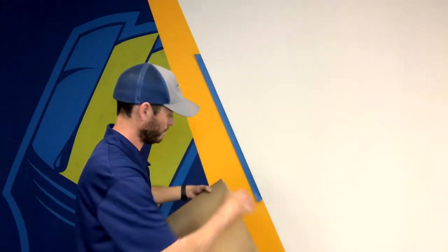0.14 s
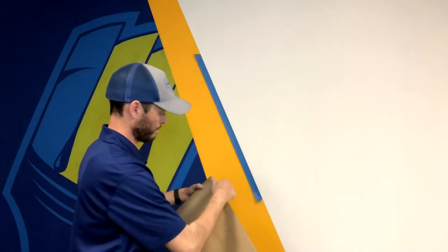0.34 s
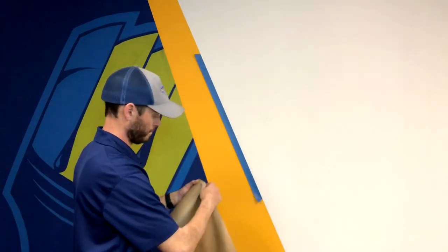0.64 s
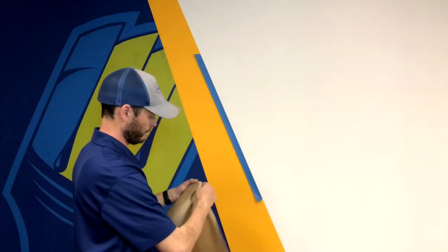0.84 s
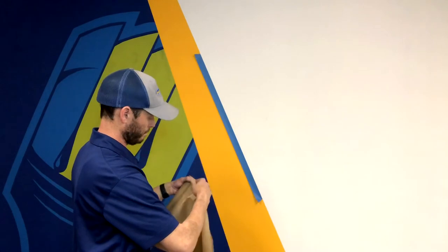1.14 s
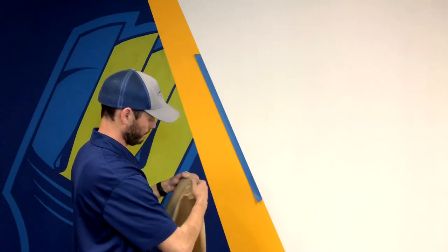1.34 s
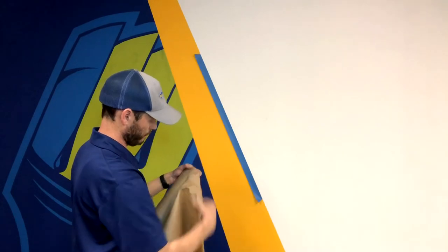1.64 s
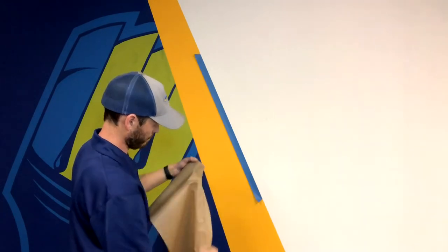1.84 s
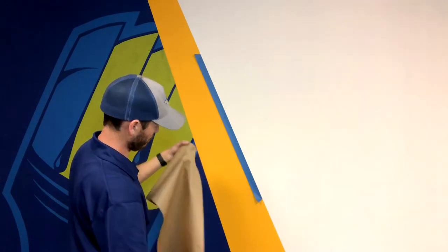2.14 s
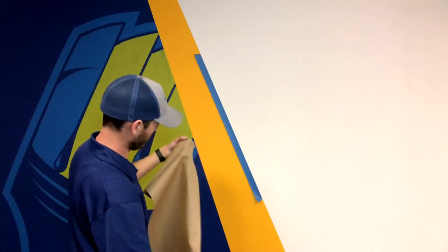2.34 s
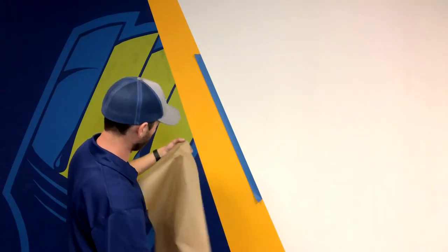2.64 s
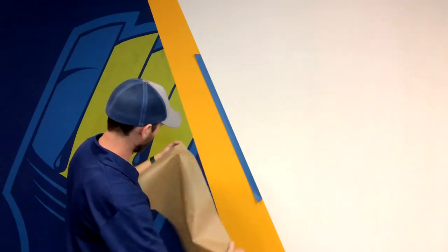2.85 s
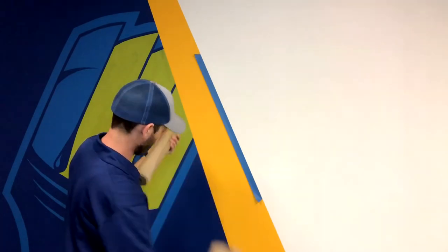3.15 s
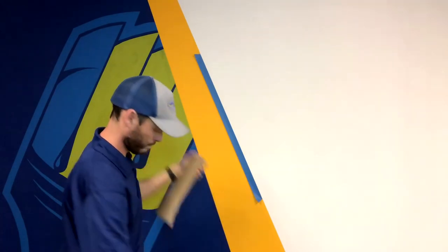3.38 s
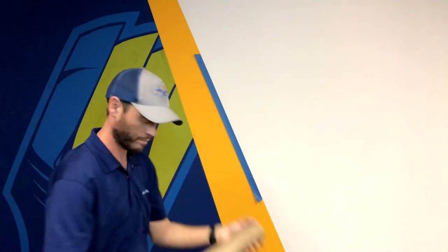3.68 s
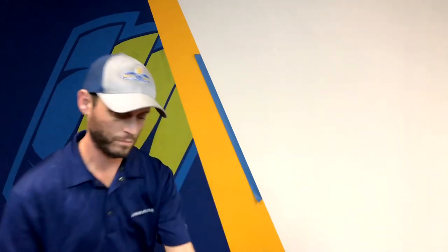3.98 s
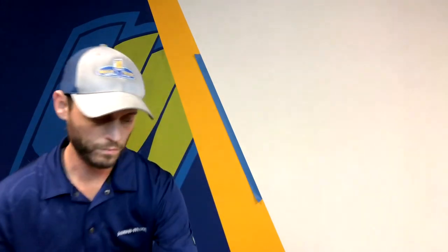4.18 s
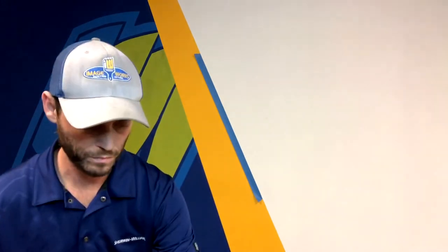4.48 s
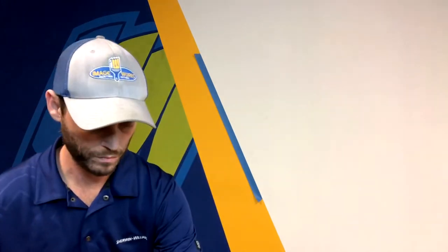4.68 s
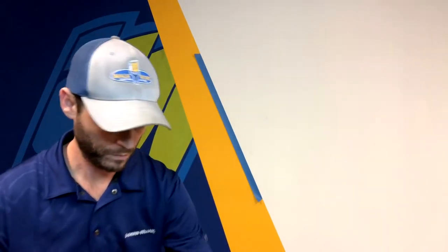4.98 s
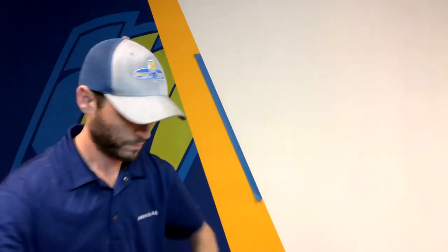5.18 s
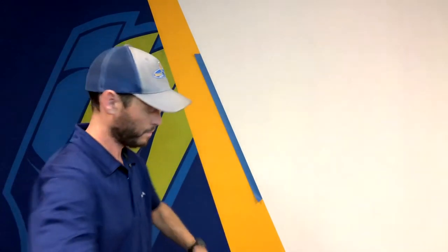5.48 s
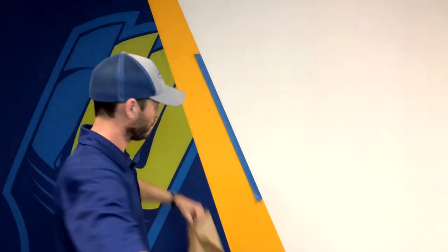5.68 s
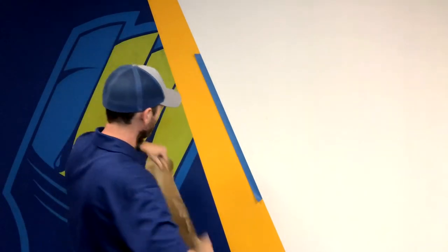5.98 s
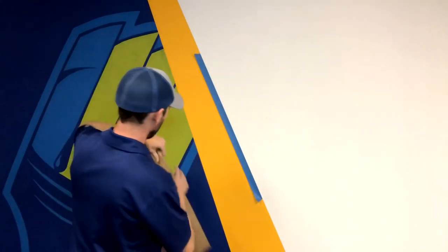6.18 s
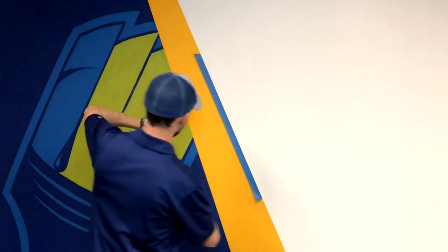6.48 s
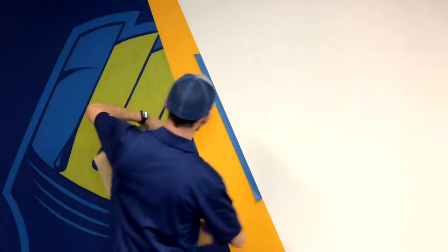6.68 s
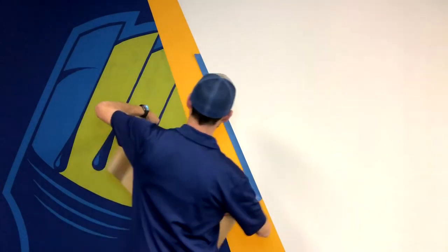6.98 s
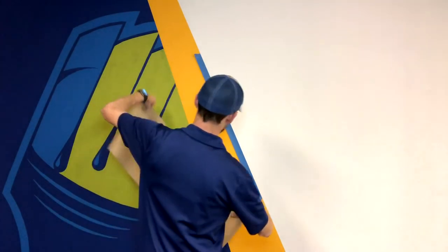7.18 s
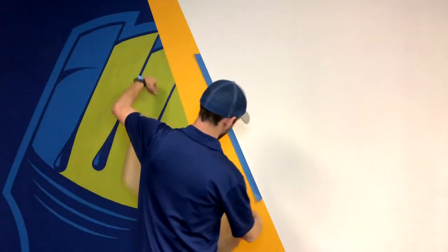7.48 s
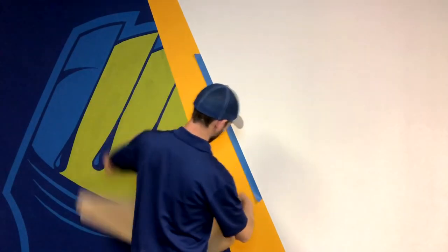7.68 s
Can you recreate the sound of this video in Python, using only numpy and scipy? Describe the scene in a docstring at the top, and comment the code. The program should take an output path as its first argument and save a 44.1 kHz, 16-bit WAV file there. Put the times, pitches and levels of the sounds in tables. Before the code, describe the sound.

In a bare, reverberant room, hands work a stiff sheet of brown paper. Soft sliding grows into sharp crackles and pops, then a short bright rip. After faint rustling, something is put down with a hollow double knock that booms briefly. The paper is gathered in a loud rustle and smoothed with crisp crinkles and a tiny faint squeak. Low ventilation rumble and light hiss continue under one fairly close microphone.

```python
"""In a bare, echoing room a man handles a sheet of brown masking paper: it slides, buckles and crackles.
He rips a piece off, sets something down with a hollow double knock, then gathers the sheet and smooths
it on the wall with a brief squeak. Paper is random clicks and hiss, filtered and dispersed as bending waves;
the tear is a dense stream of fibre breaks; the knock is contact pulses ringing damped modes.
Walls answer with decaying reflections, over ventilation rumble and faint hiss at one microphone."""
import sys
import numpy as np
from scipy import signal
from scipy.fft import rfft, irfft, next_fast_len
from scipy.io import wavfile
from scipy.ndimage import uniform_filter1d

SR = 44100
rng = np.random.default_rng(int(sys.argv[2]) if len(sys.argv) > 2 else 0)


def store_wav(level_fs):
    """Save 16-bit WAV to argv[1]."""
    pcm = np.round(np.clip(np.atleast_2d(level_fs), -1, 1) * 32767)
    wavfile.write(sys.argv[1], SR, pcm.T.astype(np.int16))


N = 345303
TIME = np.arange(N) / SR

# Steady background spectrum: [f/Hz, relative level/dB]
BACKGROUND_SPECTRUM = [(20, -9), (40, 1.5), (62, 1.5), (95, 0.5), (130, -2.5), (230, -5), (500, -7),
                       (1200, -22), (3000, -12), (7000, -18.5), (9000, -22), (16000, -30.5)]
# Reverberation of the room: [f/Hz, time to decay by 60 dB/s]
ROOM_DECAY = [(100, 0.5584), (200, 0.7809), (330, 0.3488), (1000, 0.5991), (3000, 0.8092), (7000, 0.564),
              (10000, 0.4678), (15000, 0.4123)]
# Spectrum of the room's boom after the knock: [f/Hz, relative level/dB]
BOOM_SPECTRUM = [(50, -16.5), (110, -11), (170, -2), (240, 0), (340, 5), (420, -10.5), (600, -7),
                 (780, -9.5), (980, -7.5), (1250, -16.5), (1700, -17.5), (3000, -46), (16000, -58.5)]
# Contacts of the knock: [t/s, relative level/dB, strongest frequency of the contact f/Hz]
KNOCK_CONTACTS = [(4.386, -5.5, 228.5), (4.3907, -12, 558.4), (4.405, -14.5, 130), (4.4106, -3, 853.3),
                  (4.418, -9.5, 452.6), (4.442, -23.5, 80), (4.465, -24.5, 500.4), (4.496, -24.5, 287)]
# Damped modes rung by the knock: [f/Hz, relative level/dB, time to decay by 60 dB/s]
HOLLOW_MODES = [(65.54, -15.5, 0.35), (93.754, -13, 0.25), (119.24, -11, 0.2553), (167.75, -13.5, 0.1537),
                (221.63, -13.5, .25), (258.04, -17.5, 0.239), (325.67, -20, 0.6656), (350.08, -18, 0.536),
                (464.89, -5.5, 0.07237), (526.31, -4.5, 0.0576), (631.34, -5.5, 0.0467),
                (915.7, -4.5, 0.05504), (1021.2, -0.5, 0.02555), (1332.7, -9, 0.027)]
# A hand squeaks on the paper against the wall: [t/s, length/s, mean f/Hz, relative level/dB]
HAND_SQUEAK = (7.47, .12, 1060.5, -48)
# Spectrum of tearing fibres: [f/Hz, relative level/dB]
FIBRE_SPECTRUM = [(50, -29.5), (150, -19.5), (225, -7.5), (400, -18), (520, -9), (720, -11), (950, -6),
                  (2200, -5.5), (3900, 2.5), (5600, 0), (7200, 2.5), (8500, -2.5), (12000, -5.5),
                  (16000, -11)]
# Spectrum of the crackling sheet: [f/Hz, relative level/dB]
PAPER_SPECTRUM = [(50, -31), (150, -16), (220, -5), (400, -5.5), (720, -4.5), (950, 0), (1550, 2),
                  (2400, -2), (4000, 0.5), (5600, -4), (7600, -4.5), (8500, -11), (12000, -16),
                  (16000, -23.5)]
# Strokes of the hands over the sheet: [t/s, length/s, relative starting level/dB,
# swell (+) or sag (-) over the stroke/dB, crispness/dB, low flapping/dB]
HAND_STROKES = [(-0.046, 0.14114, -40.5, -9.0, -15.5, -0.5), (0.114, 0.14492, -46.0, -3.0, -21, -1.5),
                (0.302, 0.24954, -55.0, 13.5, -3, -3.0), (0.549, 0.45, -43.5, 6, 1.5, 1),
                (0.996, 0.23296, -31.0, -10.0, -3, 2.5), (1.228, 0.1069, -30.0, -5.0, 1, -3.5),
                (1.342, 0.0937, -34.0, 6.5, 6, -3.5), (1.45, 0.11147, -36.5, -5.5, 1.0, 4),
                (1.582, 0.198, -37.5, 1.0, 0.5, 1.0), (1.768, 0.2464, -34.5, -2.0, 2.5, -1.5),
                (2.021, 0.06284, -28.5, -3.5, 3, -2.5), (2.131, 0.1543, -44.0, 0.5, -13.5, -2.5),
                (2.303, 0.19336, -35.5, -7.5, -12.5, -6.5), (2.503, 0.1593, -42.0, 6.5, -2, -4),
                (2.649, 0.3546, -31.0, -9.0, 3, 0.5), (3.243, 0.40624, -39, -17.5, -9.5, 4),
                (3.686, 0.1976, -48.0, 4.5, -6, 1.5), (3.891, 0.16035, -48.5, -6, -5, 2.5),
                (4.048, 0.3357, -46.0, -9, -7, -3.5), (4.691, 0.05901, -48.5, -2, -9.5, -5.5),
                (4.905, 0.2865, -60, -5, 4.0, -3.5), (5.197, 0.27274, -32.5, -5.5, 3.5, -4),
                (5.471, 0.126, -38.0, 4, 4, -1.5), (5.601, 0.54922, -25.5, -22.5, -1, -3),
                (6.158, 0.2266, -45.0, -0.5, 0, -0.5), (6.366, 0.1731, -34.0, -1.5, 4.5, 1.5),
                (6.513, 0.24785, -28.0, -5.5, 2, -0.5), (6.769, 0.1627, -38.0, -5.5, -0.5, 2),
                (6.917, 0.3896, -40.5, 5.0, 6.5, -0.0), (7.325, 0.1187, -45.0, -8, 3.5, -6.5),
                (7.451, 0.0992, -44, 1, 0, -1.5), (7.613, 0.2057, -45.0, 6, -1.5, -2.5)]
# Big creases that give way: [t/s, relative level/dB, decay constant/s, brightness/(dB per octave)]
BUCKLING_CREASES = [(0.424, -49.5, 0.012, 0.0), (0.5443, -34.5, 0.015, 2.5), (0.5717, -36.5, 0.026, 3.5),
                    (0.7212, -34, 0.022, 3), (0.778, -34, 0.021, 6), (1.002, -28.0, 0.005, 3),
                    (1.022, -32.5, 0.03, 1), (1.17, -38, 0.016, 12.0), (1.2376, -33.5, 0.012, 8.5),
                    (1.273, -30.5, 0.012, 1.0), (1.375, -32.0, 0.04, 7.5), (1.6432, -33.5, 0.014, 2.0),
                    (1.7978, -27, 0.012, 2.5), (1.873, -29.5, 0.0075, 1.5), (1.9425, -23.0, 0.004, 5.5),
                    (2.042, -26.5, 0.015, 2.5), (2.316, -38, 0.015, 0), (2.4952, -30.0, 0.0075, 0.5),
                    (2.593, -32.5, 0.008, 2.0), (2.6615, -32.5, 0.014, 4.5), (2.714, -31.5, 0.03, 3.5),
                    (2.851, -26, 0.0064, 4.0), (3.51, -40, 0.019, 0.5), (4.209, -47.5, 0.009, 4),
                    (4.323, -47.0, 0.0015, 0), (4.3887, -35, 0.036, -0.5), (4.609, -40, 0.011, -4.5),
                    (4.9925, -36.5, 0.0016, -1.5), (5.135, -37.5, 0.004, 0), (5.2008, -29, 0.0076, 2.5),
                    (5.2146, -22.0, 0.01, 2.5), (5.4992, -34.0, 0.016, 4.5), (6.175, -40.0, 0.018, 1.5),
                    (6.3077, -39.0, 0.014, 0), (6.423, -33, 0.012, 6.5), (7.585, -32, 0.009, 2.0)]

# Stroke onset at the usual level, and release constant; gentler strokes take hold more slowly
ATTACK_S, RELEASE_S = 0.017447, 0.03233
SLOWER_PER_DB = 0.0131
# A gentle, limp stroke mostly flexes the sheet: its middle band falls with level and crispness (dB per dB)
USUAL_DB, FLEX_PER_LEVEL, FLEX_PER_CRISP = -37, 0.2204, .2
# The rip bites quickly, weakens as the tear runs, and dies away once the piece is free
RIP_AT_S, RIP_BITE_S, RIP_RUN_S = 3.009, 0.032537, 0.1282
RIP_SAG_DB_PER_S, RIP_END_DB_PER_S = 67, 250  # the end rate adds to the sag
EDGE_HZ = 15900  # upper band limit


def amp(db):
    """Logarithmic level: decibels to amplitude gain."""
    return 10 ** (np.asarray(db) / 20)


def read(points, hz):
    """Interpolation: a table of (f/Hz, value) is read on a logarithmic frequency axis."""
    f, value = np.transpose(points)
    return np.interp(np.log(hz + 1), np.log(f + 1), value)


def add(mix, s, sound):
    """Superposition: mixes a sound in at time s."""
    part = mix[round(s * SR):][:len(sound)]
    part += sound[:len(part)]


def colour(x, spectrum, tilt=0, size=4096):
    """Minimum-phase filtering: a causal response of unit energy, tilted in dB per octave above the bass."""
    hz = abs(np.fft.fftfreq(size, 1 / SR))
    level_db = read(spectrum, hz) + tilt * np.log2(1 + hz / 1000)
    log_gain = np.log(amp(level_db))
    # the Hilbert transform of the log gain gives the minimum phase
    response = np.exp(signal.hilbert(log_gain).conj())
    taps = np.fft.ifft(response).real[:size // 2]
    return signal.oaconvolve(x, taps / np.linalg.norm(taps))[:len(x)]


def crackle(per_s, spread_db, size):
    """Random impulse process: clicks of unit mean power, many small and a few large."""
    clicks = (rng.random(size) < per_s / SR) * rng.choice([-1., 1.], size)
    clicks *= amp(spread_db * np.minimum(rng.exponential(1, size), 4.5))
    return clicks / (clicks.std() + 1e-9)


def spectra(x, size=256):
    """Short-time Fourier analysis, with frequencies as a column."""
    hz, t, z = signal.stft(x, SR, nperseg=size, noverlap=size - size // 4)
    return hz[:, None], t, z


def waveform(z, size=256):
    """Overlap-add synthesis: short-time spectra back to sound."""
    return signal.istft(z, SR, nperseg=size, noverlap=size - size // 4)[1][:N]


def background(level_db=-59):
    """Stationary filtered noise: steady ventilation rumble and faint hiss."""
    return amp(level_db) * colour(rng.standard_normal(N), BACKGROUND_SPECTRUM)


def room(x, build_s=0.0017):
    """Reverberation: dense reflections from hard walls build up quickly and decay at rates set by frequency."""
    t = np.arange(SR) / SR
    reflections = rng.choice([-1., 1.], SR) * (rng.random(SR) < 5000 / SR)
    reflections *= 1 - np.exp(-t / build_s)
    hz, age, z = spectra(reflections)
    decay = np.exp(-np.log(1000) * age / read(ROOM_DECAY, hz))
    tail = waveform(z * decay)
    return signal.oaconvolve(x, tail / np.linalg.norm(tail))[:N]


def wandering_room(x, turns_per_s=16, count=6):
    """Source-dependent reflection: the crackle cycles among spots, each with its own room response."""
    place = TIME * turns_per_s * count
    nearness = (np.maximum(1 - abs((place - k) % count - 1), 0) for k in range(count))
    return sum(room(x * np.sqrt(share)) for share in nearness)


def blows():
    """Contact force: a blunt thing lands on one edge, then flat, and settles in soft pushes and rebounds."""
    force, t = np.zeros(N), np.arange(-SR // 20, SR // 20) / SR
    for s, db, contact_hz in KNOCK_CONTACTS:
        # derivative of a Gaussian, strongest at contact_hz
        u = 2 * np.pi * contact_hz * t
        pulse = -u * np.exp(-u ** 2 / 2)
        add(force, s + t[0], amp(db) * pulse * 2 * np.pi * contact_hz / SR)
    return force


def knock(level_db=-3, boom_db=9.5, muffle_hz=1450):
    """Modal excitation: the blows ring a few hollow damped modes and set the room booming."""
    force, t = blows(), np.arange(SR) / SR
    ring = np.zeros(SR)
    for k, (hz, db, t60) in enumerate(HOLLOW_MODES):
        decay = np.exp(-np.log(1000) * t / t60)
        ring += (-1) ** k * amp(db) * decay * np.sin(2 * np.pi * hz * t)
    muffled = signal.sosfilt(signal.butter(4, muffle_hz, fs=SR, output="sos"), ring)
    hollow = signal.oaconvolve(force, muffled)[:N]
    boom = room(colour(force, BOOM_SPECTRUM))
    return amp(level_db) * hollow + amp(boom_db) * boom


def squeak(waver=.01):
    """Stick-slip friction: skin sticks and slips at a nearly steady rate for a moment."""
    s, length_s, hz, db = HAND_SQUEAK
    size, out = int(length_s * SR), np.zeros(N)
    drift = uniform_filter1d(rng.standard_normal(size), size // 20)
    turns = np.cumsum(hz * (1 + waver * drift / drift.std())) / SR
    add(out, s, amp(db) * np.hanning(size) * np.sin(2 * np.pi * turns))
    return out


def rip(level_db=-10.5, tilt=-1.1, surge_db=1.3436, surge_tilt=1.0, surge_s=0.011):
    """Fracture: fibres break in a dense stream as the tear runs, in surges that are louder and brighter."""
    age = np.maximum(TIME - RIP_AT_S, 0)
    surge = uniform_filter1d(rng.standard_normal(N), max(int(surge_s * SR), 1))
    surge = np.tanh(surge / surge.std())
    breaks = crackle(16000, 1.6, size=N)
    hz, t, z = spectra(colour(breaks, FIBRE_SPECTRUM))
    slope = tilt + surge_tilt * np.interp(t, TIME, surge)
    torn = waveform(z * amp(slope * np.log2((hz + 1000) / 6000)))
    fall_db = RIP_SAG_DB_PER_S * age + RIP_END_DB_PER_S * np.maximum(age - RIP_RUN_S, 0)
    bite = np.minimum(age / RIP_BITE_S, 1)
    return torn * bite * amp(level_db - fall_db + surge_db * surge)


def bending(x, lag_s=0.0013813):
    """Dispersion: in bending waves the treble outruns the bass, so each click is smeared."""
    size = next_fast_len(len(x) + 4096)
    hz = np.fft.rfftfreq(size, 1 / SR)
    # group delay is lag_s * sqrt(1000 / (hz + 300))
    phase = 4 * np.pi * lag_s * np.sqrt(1000 * (hz + 300))
    return irfft(rfft(x, size) * np.exp(-1j * phase), size)[:len(x)]


def handling(t):
    """Power summation of strokes that rise, swell or sag, and let go: level, crispness and flapping in dB."""
    start, length, db, swell, crisp, flap = np.transpose(HAND_STROKES)[:, :, None]
    age = t - start
    attack = ATTACK_S * np.exp(SLOWER_PER_DB * (USUAL_DB - db))
    envelope = np.clip(age / attack, 0, 1) * np.exp(-np.maximum(age - length, 0) / RELEASE_S)
    power = (envelope * amp(db + swell * np.clip(age / length, 0, 1))) ** 2
    total = power.sum(0) + 1e-12
    # crispness and flapping are averages weighted by power
    return 10 * np.log10(total), (power * crisp).sum(0) / total, (power * flap).sum(0) / total


def crease(fade_s, tilt, crack=5.5, build=0.11974, size=8000):
    """Buckling: one crack, then an avalanche of smaller clicks builds up behind it and dies down."""
    t = np.arange(size) / SR
    avalanche = np.exp(-t / fade_s) * (1 - np.exp(-t / (build * fade_s)))
    burst = crackle(7000, 2.316, size=size) * avalanche
    burst[0] += crack
    return colour(burst, PAPER_SPECTRUM, tilt)


def creases(level_db=1.5):
    """Successive buckling: the big creases give way one by one as the sheet is bent."""
    out = np.zeros(N)
    for s, db, fade_s, tilt in BUCKLING_CREASES:
        add(out, s, amp(db + level_db) * crease(fade_s, tilt))
    return out


def crinkles(level_db=-6.5, spread_db=9, fade_s=.006, tilt=3.2, tilt_per_crisp=.25, count=80):
    """Random buckling: small creases pop with strength and brightness that follow the bending stroke."""
    out = np.zeros(N)
    when, strength = rng.random((count, 2)).T
    times = (np.arange(count) + when) / count * N / SR  # one in each equal interval
    for s, level, crisp, _, luck in zip(times, *handling(times), strength):
        pop = crease(fade_s, tilt + tilt_per_crisp * crisp)
        add(out, s, amp(level + level_db + spread_db * luck) * pop)
    return out


def patches(shape, size=5):
    """Random radiation of crumpled facets: patches of colour in time and frequency, of unit spread."""
    field = uniform_filter1d(rng.standard_normal(shape), size, 0)
    field = uniform_filter1d(field, 2 * size, 1)
    return field / field.std()


def rustle(level_db=-6.0, flap_db=0.3155, flex_db=0.0854, crisp_db=0.0,
           clump_db=1.6, clump_s=.02, hiss=0.4251, ticks=0.354):
    """Friction and flexure: clumped clicks over sliding hiss; the sheet flaps low, flexes mid, creases high."""
    clumps = uniform_filter1d(rng.standard_normal(N), max(int(clump_s * SR), 1))
    grains = crackle(4000, 2.461, size=N) * amp(clump_db * clumps / clumps.std())
    grains += ticks * crackle(150, 1.4, size=N)
    grains += hiss * rng.standard_normal(N)
    hz, t, z = spectra(colour(grains / grains.std(), PAPER_SPECTRUM))
    # band weights: (f/Hz, weight)
    low = read([(500, 1), (850, 0)], hz)
    middle = read([(500, 0.4608), (850, 1), (2000, 0.6138), (3200, 0)], hz)
    high = read([(4500, 0), (8000, 0.7123), (10000, 1)], hz)
    level, crisp, flap = handling(t)
    flex = flex_db - FLEX_PER_LEVEL * (level - USUAL_DB) - FLEX_PER_CRISP * crisp
    shape_db = low * (flap + flap_db) + middle * flex + high * (crisp + crisp_db)
    facets_db = 2.0 * patches(z.shape)
    return waveform(z * amp(level + level_db + shape_db + facets_db))


def scene():
    """Superposition of direct and reflected paper sound, the knock and the background."""
    sheet = bending(rustle()) + squeak()
    pops = bending(creases() + crinkles())
    tear = bending(rip())
    direct = amp(4) * sheet + amp(1.0) * pops + amp(0.5) * tear
    walls = wandering_room(amp(0.5) * sheet + amp(1.5) * pops + amp(-1.5) * tear)
    return np.tile(direct + walls + knock() + background(), (2, 1))  # two equal channels


def record(dry, low_cut_hz=52):
    """Band limitation: a small microphone loses the deepest bass, and a steep filter the highest treble."""
    thin = signal.sosfilt(signal.butter(4, low_cut_hz, "highpass", fs=SR, output="sos"), dry)
    band_limit = signal.firwin(511, EDGE_HZ, window=("kaiser", 9), fs=SR)
    return signal.oaconvolve(thin, band_limit[None], "same")


dry = scene()
out = record(dry)
store_wav(out)
```